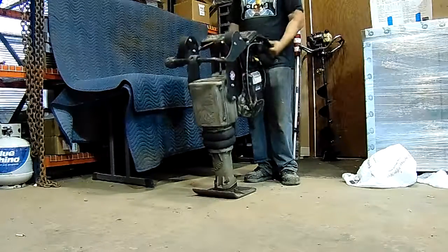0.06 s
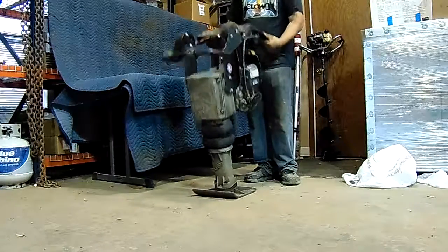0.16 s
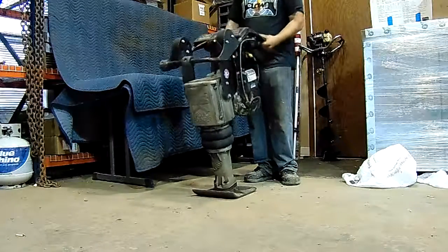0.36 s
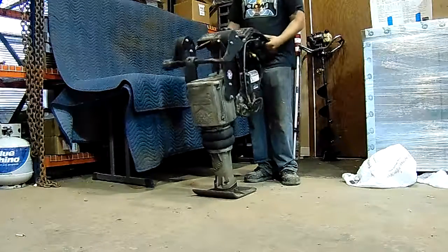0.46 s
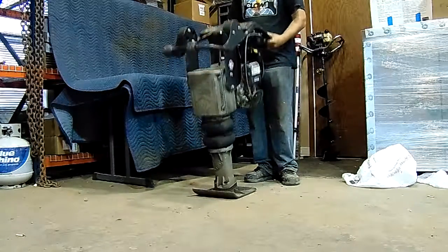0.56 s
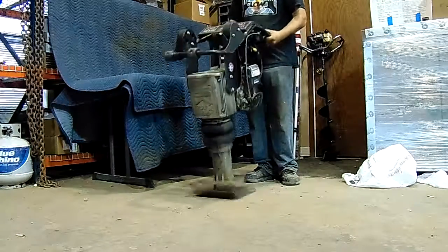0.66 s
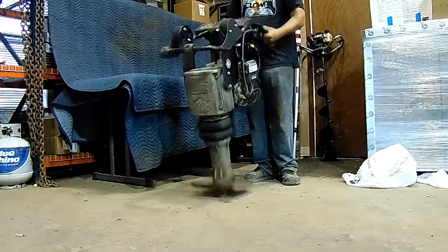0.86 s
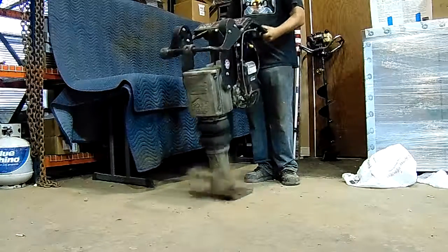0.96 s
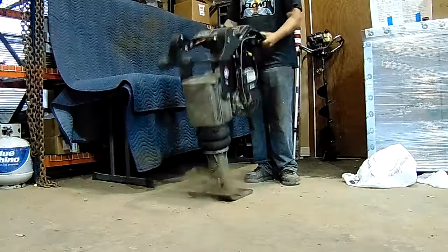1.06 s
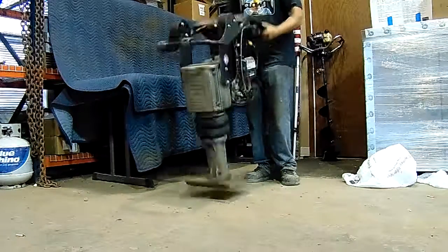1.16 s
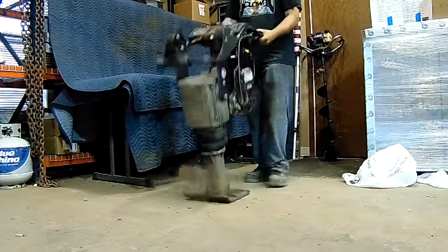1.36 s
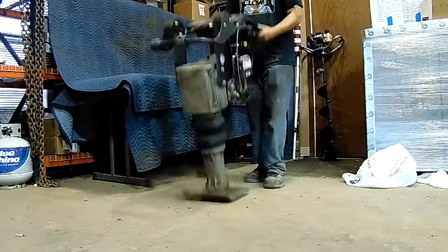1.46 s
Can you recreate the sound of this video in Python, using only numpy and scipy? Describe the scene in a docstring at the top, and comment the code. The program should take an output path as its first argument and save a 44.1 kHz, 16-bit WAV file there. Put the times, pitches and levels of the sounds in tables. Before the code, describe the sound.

A jumping-jack tamper chugs, speeds up and pounds a workshop floor with clanging thumps.

```python
"""A jumping-jack tamper in a workshop. First its one-cylinder engine putters and rattles, each firing
ringing the muffler, while the slack ram knocks in its guide. Then the engine picks up speed with a hiss.
From 0.87 s the steel foot slams the concrete five times as the throttle closes. Each blow sends a falling
chirp through the slab ahead of the clang in the air; the loudest overload the microphone."""
import sys
import numpy as np
from scipy import signal
from scipy.fft import rfft, irfft
from scipy.io import wavfile

SR = 44100
rng = np.random.default_rng(int(sys.argv[2]) if len(sys.argv) > 2 else 0)


def store_wav(level_fs):
    """Save 16-bit WAV to argv[1]."""
    pcm = np.round(np.clip(np.atleast_2d(level_fs), -1, 1) * 32767)
    wavfile.write(sys.argv[1], SR, pcm.T.astype(np.int16))


N = 66150
T = np.arange(N) / SR

# Engine speed. Each row: time in seconds, firings per second.
FIRING_RATE = [(0, 20.1), (.14, 20.24), (.29, 21.4), (.45, 19.72), (.59, 19.92), (.7, 23.23), (.83, 22.91),
               (.97, 19.45), (1.12, 23.22), (1.26, 22.95), (1.36, 20.97), (1.5, 21.91)]
# Loudness contours. Each row: time in seconds, relative level in dB.
PUFF_LEVEL = [(.02, -26), (.07, 1), (.12, 2.5), (.17, -8), (.22, 1.5), (.36, 1.5), (.41, -5.5), (.51, -8.5),
              (.56, 2.5), (.61, 3), (.70, -0.5), (.88, -1), (.98, -12), (1.12, -7), (1.25, -21),
              (1.43, -14.5)]
CLATTER_LEVEL = [(0, -26), (.2, -26.5), (.5, -24.5), (.65, -25.5), (.86, -21), (1.0, -33.5), (1.12, -33),
                 (1.3, -35), (1.45, -42.5)]
HISS_LEVEL = [(0, -36.5), (.2, -39), (.49, -36.5), (.556, -38), (.565, -25.5), (.68, -26.5), (.82, -22.5),
              (.87, -27.5), (.94, -51), (1.05, -37.5), (1.13, -43), (1.3, -49.5), (1.45, -49)]
# Normal modes. Each row: frequency in Hz, relative level in dB, free decay time (t60) in seconds.
MUFFLER_MODES = [(83.5, -19, 0.12), (108.3, -6.5, 0.17), (166.5, -6.5, 0.17), (193.8, -6.5, 0.12),
                 (213, -28, 0.099)]
HOUSING_MODES = [(477, -10, 0.045), (713, -10.5, 0.075), (912.4, -10.5, 0.17), (1040, -5.5, 0.043),
                 (1172, -2, 0.048), (1353, 0.5, 0.056), (1430, -4, .07), (1640, -14, 0.079),
                 (2375, -14, 0.043), (3060, -2, 0.032), (3654, 1, 0.013), (4100, -28, 0.047)]
FLOOR_THUMP_MODES = [(99.4, -24, 0.18)]
FOOT_MODES = [(172.7, -15, 0.13), (336, -19.5, 0.21), (608, -21.5, 0.14), (680, -14, 0.11),
              (929, -19, 0.22), (969, -5.5, 0.12), (1186, -6, 0.13), (1300, -13, 0.17), (1371, -2, 0.091),
              (1607, -15.5, 0.44), (1812, -20.5, 0.27), (2520, -25, 0.11), (3860, -22, .07),
              (4980, -20.5, 0.12), (5060, -32, 0.036), (5470, -20, 0.07)]
# Noise spectra. Each row: frequency in Hz, relative spectral density in dB.
CLATTER_SPECTRUM = [(40, 6.5), (200, 12), (300, -4), (600, -7), (800, -8.5), (1000, -2.5), (1450, -5),
                    (2000, -4), (3400, -7.5), (5000, -13.5), (7000, -16), (14000, -18)]
HISS_SPECTRUM = [(1000, -55), (4000, 2), (7000, -3.5), (9000, 3), (12500, 5.5), (14000, -2)]
KNOCK_SPECTRUM = [(300, -7), (1000, -2), (1500, 4.5), (2200, -5), (4000, 0.5), (7000, -9), (12000, -4),
                  (14000, -8.5)]
CLANG_SPECTRUM = [(60, -34), (200, -29), (400, -18.5), (650, -7.5), (1000, -1.5), (1450, 0), (2000, -17.5),
                  (4000, -19), (8000, -64)]
CRACK_SPECTRUM = [(500, -11), (1700, -1), (2400, 3.5), (3100, 3), (4000, -10), (5500, -7), (8000, -11),
                  (14000, -25)]
# Knocks of the ram. Each row: start in seconds, relative level in dB.
RAM_KNOCKS = [(0.067, -30), (.119, -4.5), (0.176, -9), (0.214, 0), (0.264, -6), (0.357, 1), (0.404, -11.5),
              (0.449, -2.5), (0.505, -0.5), (0.557, 1.5), (0.607, 0), (0.655, 3), (0.827, -4), (0.953, -4)]
# Blows and rebounds of the foot. Each row: start in seconds, thud level in dB, chirp slowness as a
# factor, clang level in dB, clang time constant in seconds, mode tilt in dB per octave, crack level
# in dB, crack tilt in dB per octave, level sent to the room in dB. Levels are relative.
FOOT_BLOWS = [(.8697, 10, 0.94, 5, 0.012, -2, -11.5, 3.5, -2),
              (0.9618, 4, 0.99, 1.5, 0.0041, -1, -11, -1.5, -13.5),
              (1.1405, -2, 0.84, -4, 0.011, 4, -15, 0.5, 0),
              (1.2140, -5.5, 0.9, -9.5, 0.0093, -2.5, -14, -4, 2),
              (1.223, -21, 1.0, -15, 0.0039, -3.5, -39, -1, -9),
              (1.2397, -36, 1.4, -17.5, 0.0057, -6, -30, -5.5, -21),
              (1.4650, -16, 1.1, -22, 0.0091, -6, -14, -1, 7)]
# Workshop reverberation. Each row: frequency in Hz, t60 in seconds.
ROOM_DECAY = [(100, 0.77), (400, 0.26), (1200, 0.36), (3000, 0.66), (6000, .38), (14000, 0.11)]
# Early reflections. Each row: delay in seconds, gain.
REFLECTIONS = [(0.0096, 0.11), (0.0167, -0.086), (.026, .15)]


def amp(db):
    """Amplitude ratio of a level in decibels."""
    return 10 ** (np.asarray(db) / 20)


def unit_rms(x):
    """Normalisation to an rms of 1."""
    return x / np.sqrt(np.mean(x ** 2) + 1e-20)


def at_time(points, t):
    """Linear interpolation over time."""
    return np.interp(t, *np.transpose(points))


def at_frequency(points, hz):
    """Interpolation over log frequency."""
    f, value = np.transpose(points)
    return np.interp(np.log(hz + 1), np.log(f + 1), value)


def add(mix, start, sound):
    """Superposition: a sound joins the mix at start seconds."""
    part = mix[max(round(start * SR), 0):][:len(sound)]
    part += sound[:len(part)]


def noise(spectrum, tilt_db=0):
    """Spectral shaping of white noise, tilted per octave, at rms 1."""
    hz = np.fft.rfftfreq(N, 1 / SR)
    gain = amp(at_frequency(spectrum, hz) + tilt_db * np.log2(hz + 1))
    return unit_rms(irfft(rfft(rng.standard_normal(N)) * gain, N))


def ring(modes):
    """Free vibration: a sum of exponentially damped modes."""
    return sum(amp(db) * np.exp(-np.log(1000) * T / t60) * np.sin(2 * np.pi * hz * T)
               for hz, db, t60 in modes)


def convolve(x, response):
    """Linear filtering by an impulse response scaled to unit energy."""
    return signal.fftconvolve(x, response / np.linalg.norm(response))[:N]


def low_cut(x, hz):
    """Second-order high-pass filtering."""
    return signal.sosfilt(signal.butter(2, hz, "high", fs=SR, output="sos"), x)


def exhaust(cycles, puff_s=0.0022, muffler_lag_s=.0018, jitter_db=.5):
    """Impulse excitation: each firing emits a pressure pulse that rings the muffler."""
    out = np.zeros(N)
    pulse_time = T / puff_s - 2
    puff = amp(-23) * 2 * pulse_time * np.exp(-pulse_time ** 2)
    boom = amp(-20) * ring(MUFFLER_MODES)
    firings = T[1:][np.diff(np.floor(cycles)) > 0]
    for start in firings:
        strength = amp(at_time(PUFF_LEVEL, start) + jitter_db * rng.standard_normal())
        add(out, start - puff_s, strength * puff)
        add(out, start + muffler_lag_s, strength * boom)
    return out


def rattle(envelope, spectrum, housing_db):
    """Forced vibration: chattering metal radiates noise and drives the housing's modes."""
    chatter = envelope * noise(spectrum)
    housing = convolve(envelope * rng.standard_normal(N), ring(HOUSING_MODES))
    return chatter + amp(housing_db) * housing


def hiss(beat, depth=0.36):
    """Amplitude modulation: the hiss of the revving drive pulses with the crank."""
    return amp(at_time(HISS_LEVEL, T)) * unit_rms(1 + depth * beat) * noise(HISS_SPECTRUM)


def engine(first_cycle=.6, lead_cycles=0.084, decay_cycles=0.13, clatter_depth=0.64):
    """Common periodicity: exhaust, clatter and hiss all follow the firing cycle."""
    cycles = first_cycle + np.cumsum(at_time(FIRING_RATE, T)) / SR
    beat = np.exp(-((cycles + lead_cycles) % 1) / decay_cycles)
    envelope = amp(at_time(CLATTER_LEVEL, T)) * unit_rms(1 + clatter_depth * beat)
    clatter = rattle(envelope, CLATTER_SPECTRUM, housing_db=-12.5 + 3.5)
    return clatter + hiss(beat) + exhaust(cycles)


def ram(rise_s=.002, decay_s=0.024, thump_lag_s=0.0046):
    """Impact excitation: each knock rattles and rings the housing, and the foot taps the floor with a low
    thump."""
    envelope, ringing = np.zeros(N), np.zeros(N)
    thump = ring(FLOOR_THUMP_MODES)
    clink = amp(-30) * ring(HOUSING_MODES)
    for start, db in RAM_KNOCKS:
        add(envelope, start, amp(db - 22) * np.minimum(T / rise_s, 1) * np.exp(-T / decay_s))
        add(ringing, start + rise_s, amp(db) * clink)
        add(ringing, start + thump_lag_s, amp(db) * thump)
    return rattle(envelope, KNOCK_SPECTRUM, housing_db=-1.5) + ringing


def slab_thud(slowness, top_hz=1500, end_hz=228, glide_s=.00095, rise_s=.0014, decay_s=.0052):
    """Dispersion: short bending waves cross concrete fastest, so a blow arrives as a falling chirp."""
    t = T / slowness  # the settings hold at slowness 1; more is longer and lower
    hz = (end_hz + (top_hz - end_hz) * np.exp(-t / glide_s)) / slowness
    envelope = np.minimum(t / rise_s, 1) * np.exp(-(t / decay_s) ** 4)
    return -envelope * np.sin(2 * np.pi * np.cumsum(hz) / SR)


def clang(decay_s, tilt_db, damping=0.047, free_s=0.013, pivot_hz=1200):
    """Contact damping: the foot rings under a noise burst, more briefly if it stays on the floor."""
    modes = [(hz, db + tilt_db * np.log2(hz / pivot_hz), t60) for hz, db, t60 in FOOT_MODES]
    steel = ring(modes) * np.exp(-damping * T / decay_s) * decay_s / free_s
    burst = noise(CLANG_SPECTRUM) * np.exp(-T / decay_s)
    return amp(-4) * burst + amp(-5) * steel


def crack(clang_s, tilt_db, rise_s=0.0026, decay_share=0.86):
    """Broadband transient: the brief impact spreads its energy far into the treble."""
    envelope = np.minimum(T / rise_s, 1) * np.exp(-T / (decay_share * clang_s))
    return envelope * noise(CRACK_SPECTRUM, tilt_db)


def foot(air_lag_s=.0038):
    """Propagation delay: the slab's thud precedes the airborne clang and crack of each blow."""
    direct, to_room = np.zeros(N), np.zeros(N)
    for start, thud_db, slowness, clang_db, clang_s, tilt, crack_db, crack_tilt, room_db in FOOT_BLOWS:
        blow = amp(thud_db) * slab_thud(slowness)
        add(blow, air_lag_s, -amp(clang_db) * clang(clang_s, tilt))
        add(blow, air_lag_s, amp(crack_db) * crack(clang_s, crack_tilt))
        add(direct, start, blow)
        add(to_room, start, amp(room_db) * blow)
    return direct, to_room


def reverberation(x, build_s=0.0089):
    """Diffuse field: scattered sound builds up in the workshop, then each band decays at its own rate."""
    hz, t, bands = signal.stft(rng.standard_normal(N), SR, nperseg=256)
    t60 = at_frequency(ROOM_DECAY, hz)[:, None]
    bands = bands * np.exp(-np.log(1000) * t / t60) * np.minimum(t / build_s, 1)
    response = signal.istft(bands, SR, nperseg=256)[1][:N]
    return convolve(x, response)


def scene():
    """Superposition of direct sound, reverberation and the early reflections of the blows."""
    machine = engine() + ram()
    blows, to_room = foot()
    to_room = low_cut(to_room, hz=500)
    tail = reverberation(amp(-13.5) * low_cut(machine, hz=160) + amp(-12.5) * to_room)
    out = machine + blows + tail
    for delay, gain in REFLECTIONS:
        add(out, delay, gain * to_room)
    return out[None]


def record(dry, hardness=11, top_hz=14200):
    """Saturation: the microphone loses deep bass and clips the loudest blows; a band limit follows."""
    x = low_cut(dry, hz=39)
    clipped = x / (1 + abs(x) ** hardness) ** (1 / hardness)
    low_pass = signal.firwin(511, top_hz, window=("kaiser", 9), fs=SR)
    return signal.oaconvolve(clipped, low_pass[None], "same")


dry = scene()
out = record(dry)
store_wav(out)
```